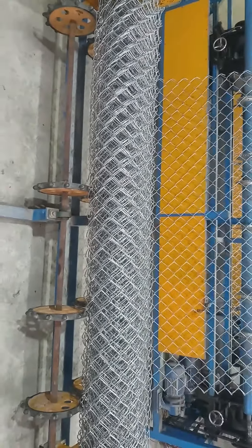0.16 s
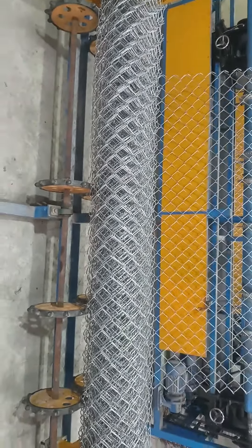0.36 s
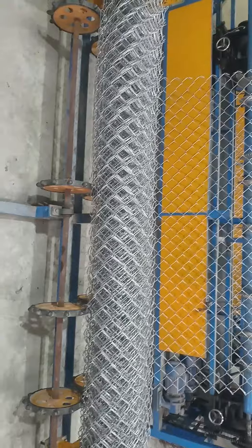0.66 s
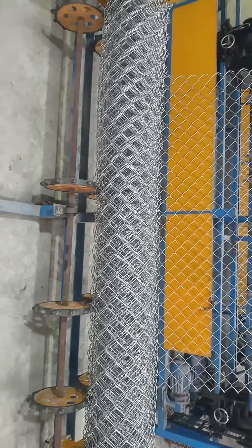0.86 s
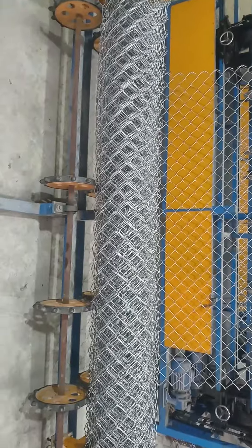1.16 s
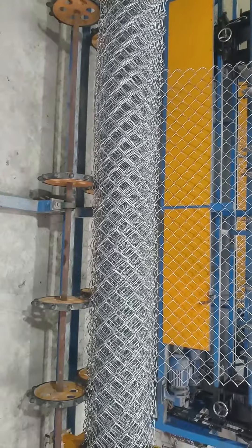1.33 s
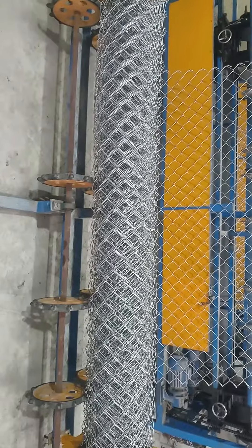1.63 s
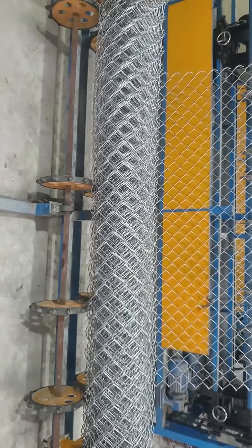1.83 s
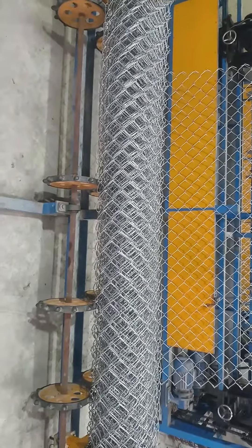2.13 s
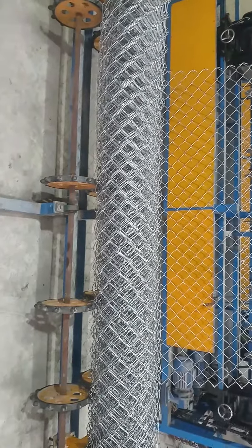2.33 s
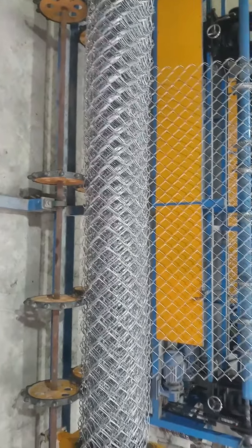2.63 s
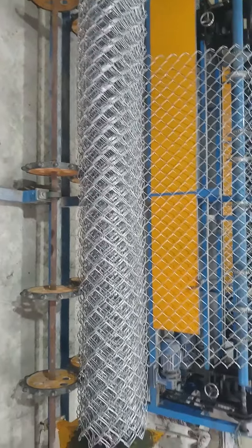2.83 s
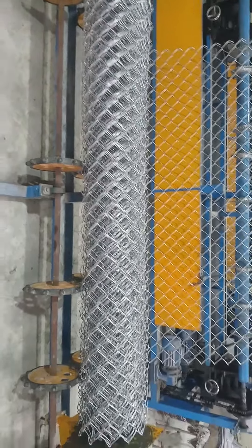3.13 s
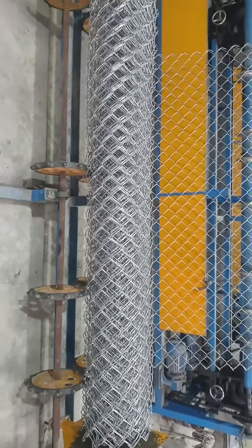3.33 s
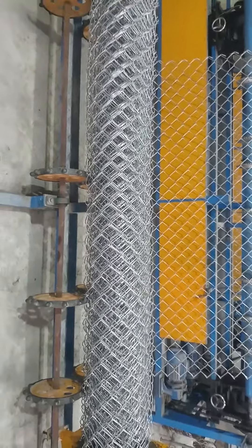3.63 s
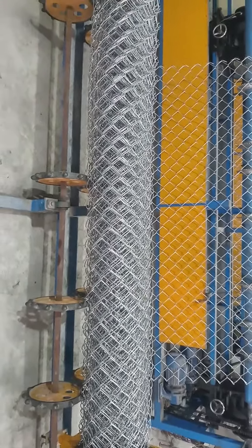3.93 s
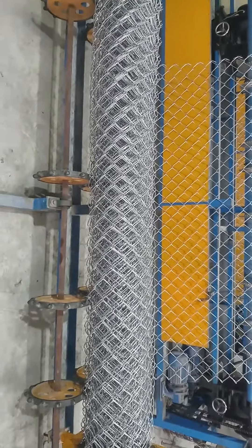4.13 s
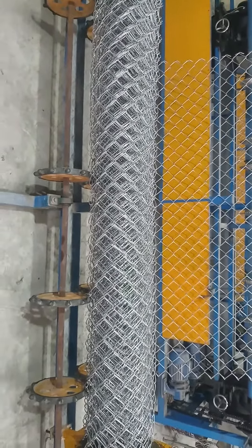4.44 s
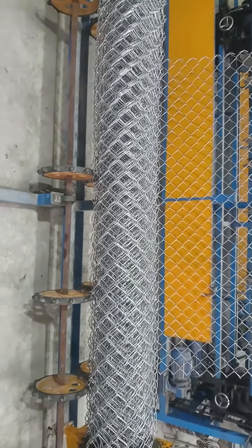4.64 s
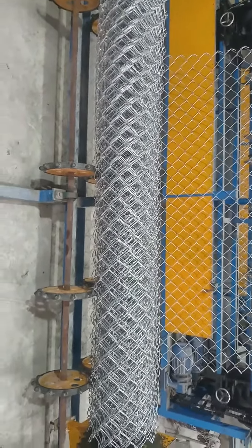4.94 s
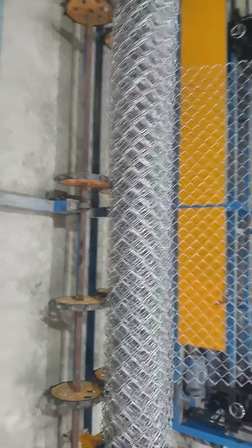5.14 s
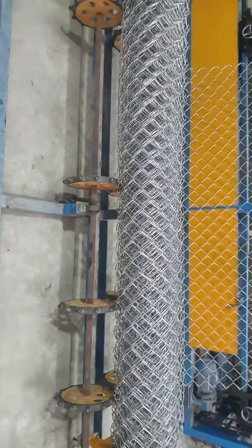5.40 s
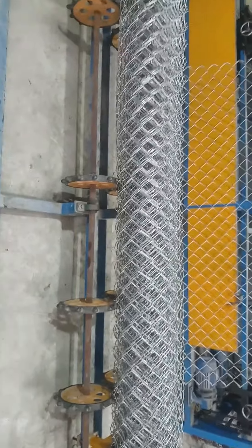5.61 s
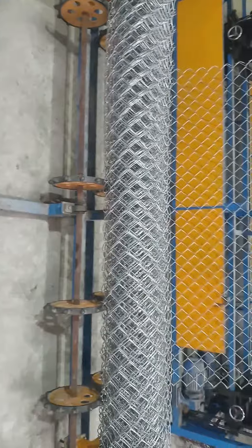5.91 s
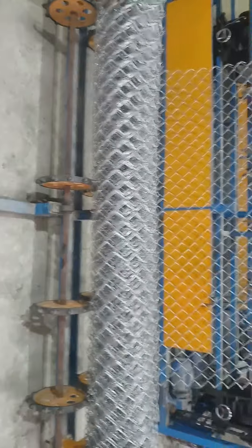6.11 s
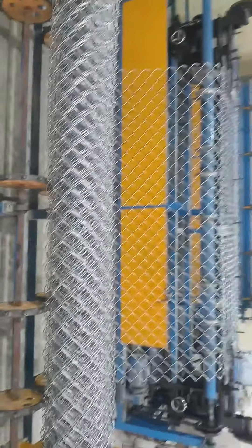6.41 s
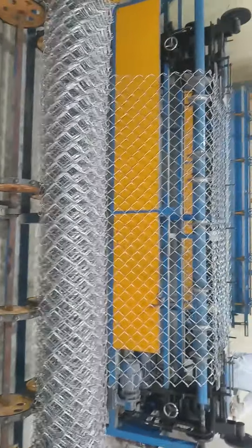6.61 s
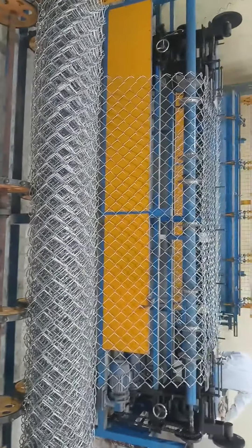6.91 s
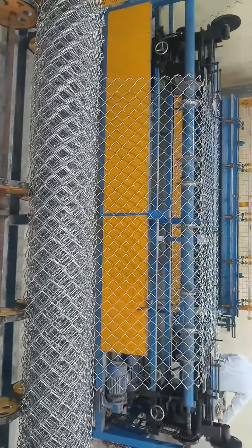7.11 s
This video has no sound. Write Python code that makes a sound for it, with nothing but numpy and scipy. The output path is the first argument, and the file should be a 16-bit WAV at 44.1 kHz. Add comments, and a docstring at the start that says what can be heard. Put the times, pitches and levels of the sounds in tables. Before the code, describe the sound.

Steady dense hiss of wire spiralling through steel mesh over low humming drives, swelling until low thuds flutter and it cuts off. The hall's tail fades under jolts, faint jingling and a sharp air release. A second hissing run starts with wires slapping and narrow metallic singing, then ends in a clunk, ringing wire and another air jet. Mono, loud, slightly saturated, in a big hard room.

```python
"""A dense metallic hiss comes first: a wire spiral whirls through the mesh of a weaving machine, over humming drives.
Dull pops thicken as the run ends; a lever clunks, taut wires ping, a valve lets off air and a second run follows.
Random contact clicks blur into hiss and chatter, narrow resonances sing and jingle, and wires slap on steel.
Filtered noise makes roar, groan, hum, pings, clunks and air jets; the hall drags the tails out, treble dying first.
The loud hiss overloads a small microphone."""
import sys
import numpy as np
from scipy import signal
from scipy.fft import rfft, irfft, next_fast_len
from scipy.io import wavfile
from scipy.ndimage import uniform_filter1d

SR = 44100
rng = np.random.default_rng(int(sys.argv[2]) if len(sys.argv) > 2 else 0)


def master(y):
    """Save y as 16-bit WAV."""
    cut = np.clip(np.atleast_2d(y).T, -1, 1)
    pcm = np.round(cut * 32767)  # scale
    wavfile.write(sys.argv[1], SR, pcm.astype(np.int16))


def gain_from_db(level_db):
    """Convert decibel levels to linear amplitude factors (20 dB per decade)."""
    decades = np.asarray(level_db, float) / 20
    return 10 ** decades


N = 320166   # samples in the scene

# runs of the spiral, the second trailing off faintly:
# (time [s], wire hiss [dB], its upper half [dB], near chatter [dB])
RUNS = [
    [(0.0, -16.5, -17.5, -27.5), (0.3, -15, -17.5, -28), (0.85, -15.5, -17.5, -27), (1.3, -14, -17.5, -26),
     (2.05, -13, -19.5, -25), (2.21, -14, -18.5, -28)],
    [(3.5, -18, -39, -44), (3.84, -20.5, -26, -38), (3.87, -20, -17.5, -43), (4.02, -19, -21, -33),
     (4.22, -18.5, -19.5, -33), (4.6, -17.5, -17.5, -38), (4.85, -16, -15.5, -30), (5.25, -17, -19.5, -31),
     (5.8, -16, -16, -33), (6.17, -16.5, -18, -35), (6.32, -17.5, -20.5, -43), (6.4, -36, -38, -48),
     (7.0, -40, -35, -48)],
]
# jolts that shake the resting mesh: (time [s], wire hiss [dB], its upper half [dB])
JOLTS = [(2.53, -17.5, -26.5), (2.66, -22, -22), (3.04, -29, -28), (3.16, -28, -23), (6.55, -18, -22.5),
         (6.67, -25, -23.5), (7.025, -24.5, -24)]
# far machines, always there: one level [dB] each for hiss, upper half, chatter, roar
FAR_MACHINES = [-37, -63, -70, -37.5]
# wires slapping on steel, strength of each kick: (time [s], treble [dB], body [dB])
SLAPS = [(2.5067, -28, -16), (2.6294, -31, -18.5), (3.0265, -40, -30), (3.1507, -31.5, -28),
         (3.474, -33.5, -14.5), (3.5982, -34, -35), (3.6481, -30, -18), (3.7763, -28.5, -35),
         (3.8494, -29.5, -17), (3.8894, -29, -32), (3.9534, -28.5, -28), (4.1106, -28.5, -27),
         (4.2594, -20, -33), (4.3301, -27.5, -21), (4.4594, -29.5, -25), (4.4982, -28, -30),
         (4.582, -23, -29), (4.6508, -19, -30), (4.8194, -22.5, -28), (4.9062, -25, -24),
         (4.9621, -26.5, -32), (5.1033, -19, -16), (5.2994, -25.5, -29), (5.3682, -20, -31),
         (5.465, -25.5, -20), (5.5952, -19.5, -33), (5.681, -24, -31), (5.7594, -20, -22),
         (5.8242, -18, -22), (5.9314, -20, -25), (6.0117, -24, -23), (6.104, -21, -29), (6.5475, -31, -28),
         (6.6544, -30, -18.5), (7.0125, -31, -23), (7.0249, -31, -29)]
# relative spectrum of the wire hiss: (frequency [Hz], density [dB])
WIRE_SPECTRUM = [(530, -24), (900, -15), (1080, -13), (1510, -11.5), (2350, -7.5), (2810, -4), (3470, -1.5),
                 (4150, 2.5), (4680, 2.5), (5020, 1.5), (5830, 0.5), (7790, 3), (8520, -1.5), (9800, -30.5),
                 (12700, -39), (21600, -120)]
# resonances that sing while a part is rubbed:
# (start [s], end [s], frequency [Hz], width [Hz], level re wire hiss [dB])
SINGING = [(0, 2.7, 4170, 180, -7), (0, 2.6, 5030, 95, -7), (0, 2.1, 7450, 300, -14),
           (3.5, 5.0, 2830, 20, -18), (5.05, 5.75, 2830, 16, -13), (6.03, 6.27, 2830, 16, -11),
           (4.4, 6.35, 1085, 75, -21), (3.9, 4.3, 700, 40, -24), (3.8, 4.0, 7520, 50, -7),
           (4.4, 6.2, 7500, 40, -9), (3.8, 4.0, 5500, 60, -10), (4.63, 4.8, 5440, 25, -3),
           (5.3, 6.2, 5480, 70, -12), (3.6, 4.5, 6300, 60, -12), (4.8, 5.6, 4410, 60, -11),
           (4.6, 4.8, 10130, 40, -32), (5.55, 5.7, 10130, 40, -27), (4.6, 6.2, 11350, 180, -30)]
# loose wires jingling: (time [s], level re wire hiss [dB])
JINGLE = [(0, -14), (2.2, -14), (2.8, -8), (3.2, -8), (3.4, -12), (3.7, -5), (6.3, -5), (6.6, -8),
          (7.26, -9)]
# relative spectrum of the nearest wires' clicks: (frequency [Hz], density [dB])
CHATTER_SPECTRUM = [(6000, -1), (9300, -0.5), (9750, -6), (11400, 0), (13000, -2.5), (15000, -2.5),
                    (15900, -10)]
# relative spectrum of the hall's roar: (frequency [Hz], density [dB])
HALL_SPECTRUM = [(15, -60), (25, -38), (96, -8.5), (156, -8), (248, -10), (300, -6.5), (357, -1.5),
                 (546, -5), (649, -0.5), (1270, -4.5), (2500, -3), (3250, -15), (5500, -120)]
# the drives: (time [s], groan [dB], low hum [dB])
DRIVES = [(0.0, -44.5, -50), (1.2, -45, -55), (1.9, -46, -37), (2.2, -51, -57), (2.6, -36.5, -53),
          (3.2, -49.5, -53), (3.5, -42, -52), (3.9, -43, -55.5), (4.4, -37, -57), (5.2, -36.5, -57),
          (6.24, -32.5, -48), (6.36, -40, -47), (6.62, -36.5, -42), (7.26, -43, -52)]
# dull low pops: (time [s], peak of one click [dB])
POPS = [(0.139, -29), (0.889, -26), (1.046, -22), (1.25, -16), (1.344, -24), (1.395, -20.5), (1.465, -23),
        (1.516, -21), (1.56, -21), (1.635, -18), (1.703, -18), (1.771, -19), (1.819, -18), (1.859, -14.5),
        (1.928, -13.5), (1.97, -15), (2.055, -14.5), (2.089, -13), (2.11, -16), (3.24, -19), (3.271, -22),
        (4.672, -15), (5.11, -20), (5.365, -22), (5.595, -27), (5.798, -20), (5.826, -21), (5.935, -21),
        (7.1, -18.5)]
# a heavy lever hits its stop, strength of the kick: (time [s], level [dB])
CLUNKS = [(2.51, -31), (6.55, -23.5)]
# modes of the frame the lever shakes: (frequency [Hz], width [Hz], relative level [dB])
FRAME_MODES = [(114, 36, -1.5), (246, 90, -2), (378, 53, 4), (665, 210, -10), (990, 140, -1)]
# taut wires pinging: (time [s], frequency [Hz], strength of the kick [dB], 60 dB decay [s])
PINGS = [(3.03, 8300, -25, 0.37), (3.025, 11000, -40, .25), (2.87, 5250, -39, .4), (4.1, 8200, -16, 0.2),
         (3.68, 6800, -17, 0.18), (3.79, 8200, -12.5, 0.07), (6.93, 8400, -31, 0.25),
         (7.03, 8450, -19, 0.29), (7.0, 10050, -37, .3)]
# air let off by a valve: (time [s], level [dB], held open [s])
BLASTS = [(3.2154, -10, 0.05), (7.063, -10.5, 0.055)]
# relative spectrum of the air jet: (frequency [Hz], density [dB])
JET_SPECTRUM = [(900, -14), (1500, -15), (2600, -7.5), (3600, 0.5), (5100, 1), (6500, -6), (7800, -1),
                (9700, -29), (11000, -50)]

SPLIT_HZ = 5670   # the upper half of the hiss lies above
JOLT_CHATTER_DB, JOLT_ROAR_DB = -15, -8   # re the jolt's hiss
AFTER_BLAST_DB, AFTER_BLAST_ROAR_DB = -2.5, -17   # hiss and roar the hall keeps, re the blast
ROAR_DB, ROAR_FOLLOWS, USUAL_HISS_DB = -29.5, 0.74, -15   # roar at the usual hiss, share of its swing
HISS_T60_S, UPPER_T60_S, CHATTER_T60_S, ROAR_T60_S = 2.53, 0.86, 0.7, 2.57   # hall decays
SLAP_BODY_T60_S, SLAP_TREBLE_T60_S = 0.36, 0.25
SLAP_BODY_RISE_S, SLAP_TREBLE_RISE_S = 0.0083, 0.0046
GROAN_HZ, GROAN_WIDTH_HZ = 243.4, 68
GROAN_WAVER_DB, HUM_WAVER_DB = 2.0, 1
# small pops fill in as the first run ends
FLUTTER_FROM_S, FLUTTER_TO_S, FLUTTER_PER_S, FLUTTER_DB = 1.25, 2.17, 70, -23
MICROPHONE_TOP_HZ = 15750


def rms_one(x):
    """Scale to rms 1."""
    return x / np.sqrt(np.mean(x ** 2) + 1e-20)


def noise():
    """White noise for the whole scene."""
    return rng.standard_normal(N)


def seconds():
    """The time of every sample."""
    return np.arange(N) / SR


def in_time(rows):
    """Draw the columns of a table as one value per sample."""
    s, *columns = np.transpose(rows)
    return [np.interp(seconds(), s, column) for column in columns]


def shaped(x, gain):
    """Multiply the spectrum by a function of frequency."""
    size = next_fast_len(N)
    hz = np.maximum(np.fft.rfftfreq(size, 1 / SR), 1)
    return irfft(rfft(x, size) * gain(hz), size)[..., :N]


def colour(x, points):
    """Give a signal a spectrum, next to nothing outside it, at rms 1."""
    point_hz, db = np.transpose(points)

    def gain(hz):
        return gain_from_db(np.interp(np.log(hz), np.log(point_hz), db, -120, -120))

    return rms_one(shaped(x, gain))


def drift(rate_hz):
    """Slow random wander with spread 1, drawn at every 40th sample."""
    r = np.exp(-80 * np.pi * rate_hz / SR)
    draws = rng.standard_normal(N // 40 + 2002)
    slow = signal.lfilter([1], [1, -2 * r, r * r], draws)[2000:]   # drop the filter's start
    return np.interp(np.arange(N) / 40, np.arange(len(slow)), rms_one(slow))


def contacts(per_s, spread_db):
    """Random wire-on-wire clicks of uneven size, either polarity."""
    sizes = gain_from_db(spread_db * np.minimum(rng.exponential(1, N), 5)) * rng.choice([-1, 1], N)
    return rms_one(sizes * (rng.random(N) < per_s / SR))


def resonate(x, hz, width_hz):
    """Ring one resonance, rms 1."""
    r = np.exp(-np.pi * width_hz / SR)
    return rms_one(signal.lfilter([1, 0, -1], [1, -2 * r * np.cos(2 * np.pi * hz / SR), r * r], x))


def bursts(times_s, db, t60_s, rise_s):
    """Power that swells over the rise time and dies away after each kick."""
    kicks = np.zeros(N)
    kicks[np.minimum((np.array(times_s) * SR).astype(int), N - 1)] = gain_from_db(2 * np.array(db))
    fall = gain_from_db(-120 / (t60_s * SR))
    swell = np.exp(-1 / (rise_s * SR))
    dying = signal.lfilter([1], [1, -fall], kicks + 1e-18)
    return signal.lfilter([1 - swell], [1, -swell], dying)


def linger(db, t60_s):
    """A level rises at once but falls no faster than the hall lets it."""
    fall = 60 * seconds() / t60_s
    return np.maximum.accumulate(db + fall) - fall


def cycle():
    """Levels of hiss, upper half, chatter and roar: runs, jolts and blasts feed them, the hall drags them out."""
    fed = np.full((4, N), -99.)
    for run in RUNS:
        s, *columns = np.transpose(run)
        levels = [np.interp(seconds(), s, column, -99, -99) for column in columns]
        fed[:3] = np.maximum(fed[:3], levels)
    fed[3] = ROAR_DB + ROAR_FOLLOWS * (fed[0] - USUAL_HISS_DB)
    for s, db, upper_db in JOLTS:
        fed[:, int(s * SR)] = db, upper_db, db + JOLT_CHATTER_DB, db + JOLT_ROAR_DB
    for s, db, held_s in BLASTS:   # feeds hiss and roar only
        fed[::3, int((s + held_s) * SR)] = db + AFTER_BLAST_DB, db + AFTER_BLAST_ROAR_DB
    levels = []
    for db, t60_s, far_db in zip(fed, (HISS_T60_S, UPPER_T60_S, CHATTER_T60_S, ROAR_T60_S), FAR_MACHINES):
        smooth_db = uniform_filter1d(linger(db, t60_s), size=441)   # over 10 ms
        levels.append(10 * np.log10(gain_from_db(2 * smooth_db) + gain_from_db(2 * far_db)))
    return levels


def singing(flutter_db):
    """Rubbing excites narrow resonances that fade in, flutter and fade out one by one."""
    out, t, rub = 0, seconds(), noise()
    for start, end, hz, width_hz, db in SINGING:
        rubbed = np.clip(np.minimum(t - start + 0.043, end - t + 0.045) / 0.1, 0, 1)
        out = out + rubbed * gain_from_db(db + flutter_db * drift(5.4)) * resonate(rub, hz, width_hz)
    return out


def jingle():
    """Many wires of all lengths light up for a moment each."""
    rub, wires = noise(), 0
    for hz in np.linspace(3600, 8500, 14) + rng.normal(0, 90, 14):
        wires = wires + gain_from_db(8 * np.minimum(drift(6), 2)) * resonate(rub, hz, 70)
    return gain_from_db(in_time(JINGLE)[0]) * rms_one(wires)


def wire_hiss(hiss_db, upper_db):
    """Thousands of contacts a second blur into a hiss; every slap adds a burst that the hall drags out."""
    s, _, body_db = np.transpose(SLAPS)
    wash = colour(contacts(30000., 2.35), WIRE_SPECTRUM)
    low = signal.sosfilt(signal.butter(4, SPLIT_HZ, fs=SR, output="sos"), wash)
    high = signal.sosfilt(signal.butter(4, SPLIT_HZ, "high", fs=SR, output="sos"), wash)
    level = np.sqrt(gain_from_db(2 * hiss_db) + bursts(s, body_db, SLAP_BODY_T60_S, SLAP_BODY_RISE_S))
    lower = rms_one(low) * gain_from_db(0.5 * drift(29.0))
    upper = rms_one(high) * gain_from_db(upper_db + 1.2 * drift(23.0))   # upper_db is re the hiss
    return level * (lower + upper + singing(flutter_db=1.5) + jingle())


def chatter(chatter_db):
    """The nearest wires: only their sparser, sharper clicks reach the top octave, where the hall swallows tails."""
    s, treble_db, _ = np.transpose(SLAPS)
    level = np.sqrt(gain_from_db(2 * chatter_db) + bursts(s, treble_db, SLAP_TREBLE_T60_S, SLAP_TREBLE_RISE_S))
    return level * gain_from_db(0.87 * drift(25.0)) * colour(contacts(12000., 2.9), CHATTER_SPECTRUM)


def hall(roar_db):
    """The broad roar of the hall, as coloured noise."""
    return gain_from_db(roar_db) * colour(noise(), HALL_SPECTRUM)


def drives():
    """A groan under load and a low hum, each noise through two resonances, wavering in level."""
    groan_db, hum_db = in_time(DRIVES)
    groan = resonate(resonate(noise(), GROAN_HZ, GROAN_WIDTH_HZ), GROAN_HZ, 2 * GROAN_WIDTH_HZ)
    hum = resonate(resonate(noise(), 111.4, 15.), 113.0, 30.)
    groan_gain = gain_from_db(groan_db + GROAN_WAVER_DB * drift(4.4))
    hum_gain = gain_from_db(hum_db + HUM_WAVER_DB * drift(2.9))
    return groan_gain * groan + hum_gain * hum


def pops():
    """Short dull pops: three blunt clicks in a clump, and a random flutter of small ones."""
    s, db = np.transpose(POPS)
    lag_s = np.array([0, .006, .017]) + rng.uniform(0, 0.004, (len(s), 3))
    clicks = np.zeros(N)
    places = ((s[:, None] + lag_s) * SR).astype(int)
    clicks[places] = gain_from_db(db[:, None]) * rng.choice([-1, 1], (len(s), 3))
    t = seconds()
    small = (rng.random(N) < FLUTTER_PER_S / SR) & (t > FLUTTER_FROM_S) & (t < FLUTTER_TO_S)
    clicks += small * gain_from_db(FLUTTER_DB) * noise()
    blunt = np.vstack([signal.butter(1, [45., 300.], "band", fs=SR, output="sos"),
                       signal.butter(1, 30., "high", fs=SR, output="sos"),
                       signal.butter(2, 650., fs=SR, output="sos")])
    one_click_peak = signal.sosfilt(blunt, signal.unit_impulse(SR // 10)).max()
    return signal.sosfilt(blunt, clicks + 1e-18) / one_click_peak


def clunks():
    """The lever's blow shakes the frame and its rumble lingers in the hall."""
    s, db = np.transpose(CLUNKS)
    frame = sum(gain_from_db(mode_db) * resonate(noise(), hz, width_hz) for hz, width_hz, mode_db in FRAME_MODES)
    return np.sqrt(bursts(s, db, t60_s=0.94, rise_s=0.0042)) * rms_one(frame)


def pings():
    """Taut wire rings briefly with a rough edge: noise through a resonance, dying away."""
    out = 0
    for s, hz, db, t60_s in PINGS:
        out = out + np.sqrt(bursts([s], [db], t60_s, rise_s=0.0027)) * resonate(noise(), hz, 120.)
    return out


def blasts():
    """The jet starts at once, holds while the valve is open, then fades in the hall, its top octave first."""
    t, body, edge = seconds(), 0, 0
    for s, db, held_s in BLASTS:
        after = np.maximum(t - s - held_s, 0)
        body = body + (t > s) * gain_from_db(db - 60 * after / 1.0)   # 60 dB down in 1 s
        edge = edge + np.clip((t - s) / 0.013, 0, 1) * gain_from_db(db - 16.0 - 60 * after / 0.3)
    return body * colour(noise(), JET_SPECTRUM) + edge * colour(noise(), CHATTER_SPECTRUM)


def scene():
    """Mix the machine and its hall; one microphone feeds both channels."""
    hiss_db, upper_db, chatter_db, roar_db = cycle()
    wires = wire_hiss(hiss_db, upper_db - hiss_db) + chatter(chatter_db) + pings()
    room = hall(roar_db) + drives()
    mono = wires + room + pops() + clunks() + blasts()
    return np.array([mono, mono])


def band_limit(x):
    """A steep low-pass at the top of the band."""
    return signal.sosfilt(signal.butter(12, 16350, fs=SR, output="sos"), x)


def record(dry):
    """The overloaded microphone rounds peaks off towards full scale, and the top is cut sharply."""
    rounded = dry / (1 + np.abs(dry) ** 6) ** (1 / 6)
    finished = shaped(rounded, lambda hz: hz < MICROPHONE_TOP_HZ)
    return band_limit(finished)


dry = scene()
out = record(dry)
master(out)
```